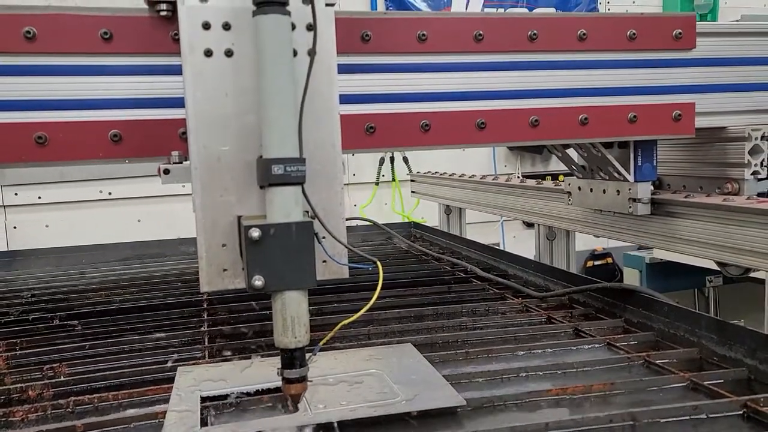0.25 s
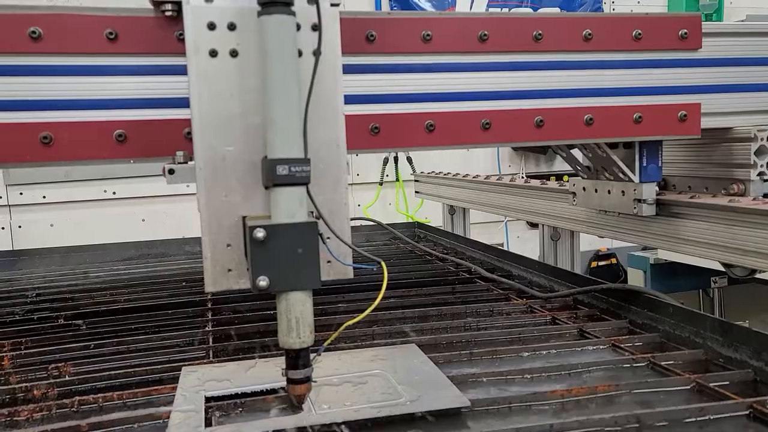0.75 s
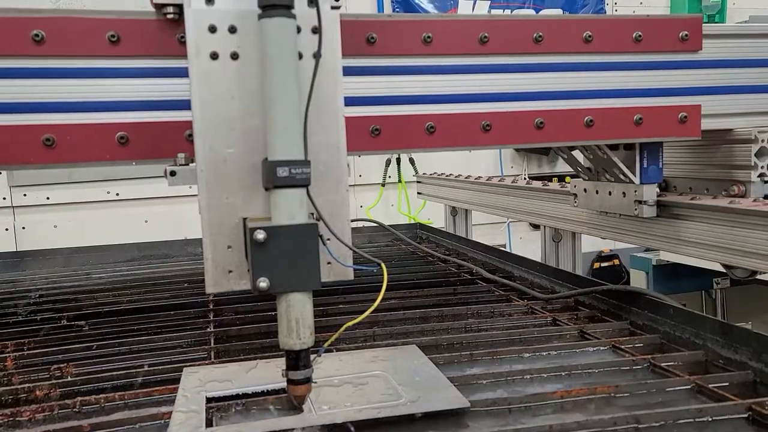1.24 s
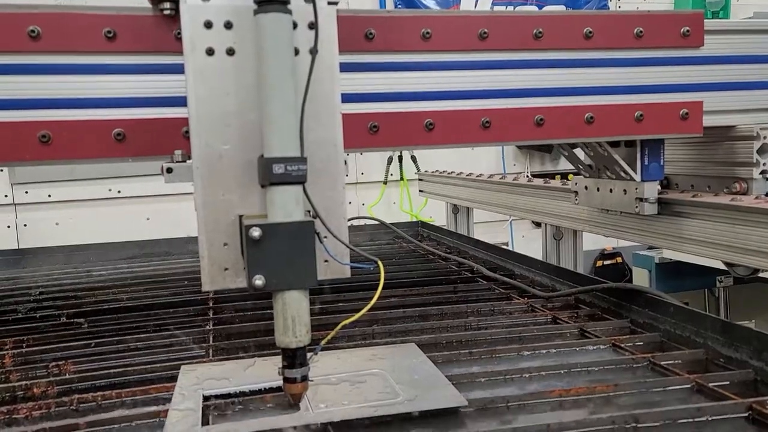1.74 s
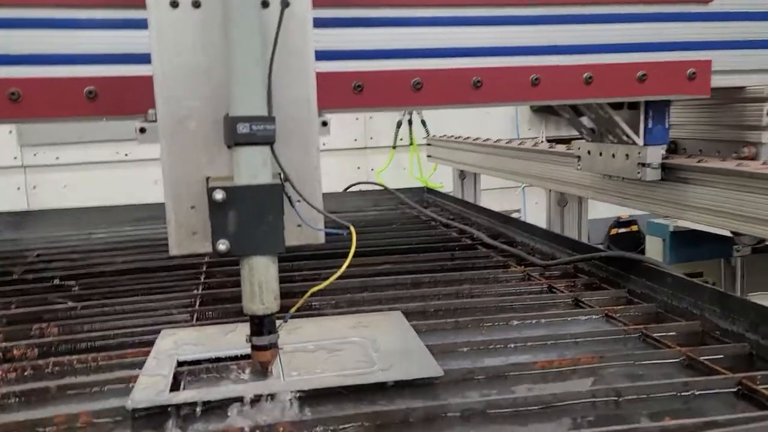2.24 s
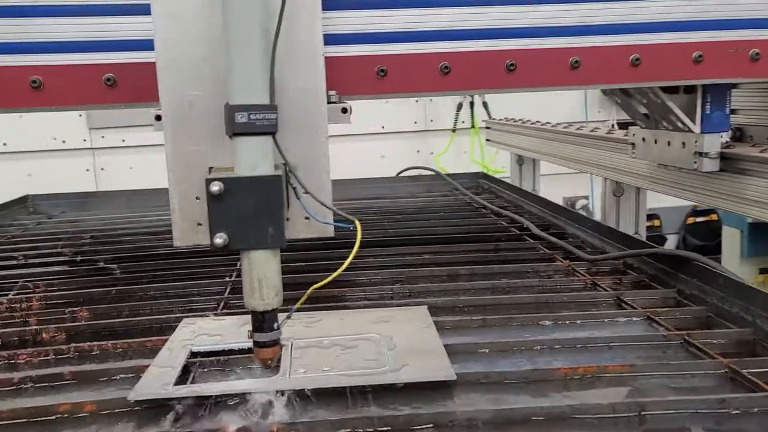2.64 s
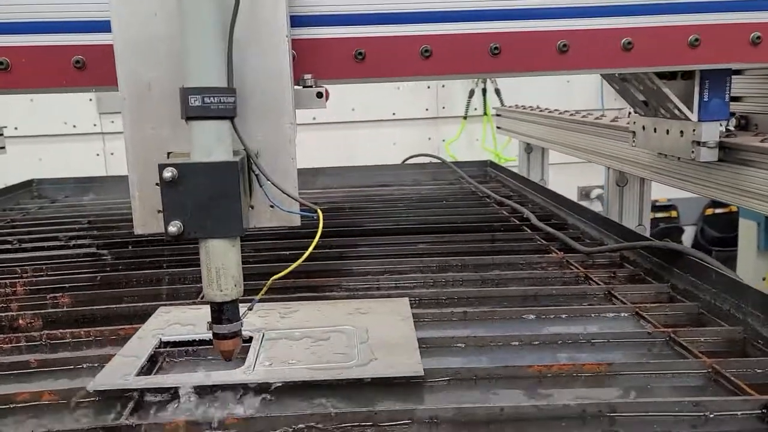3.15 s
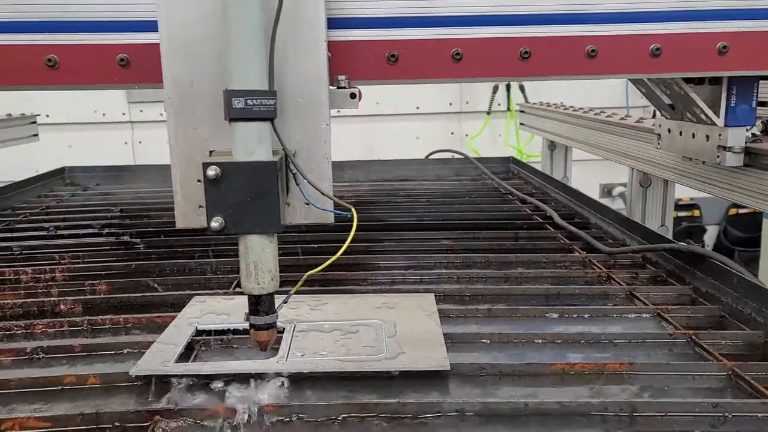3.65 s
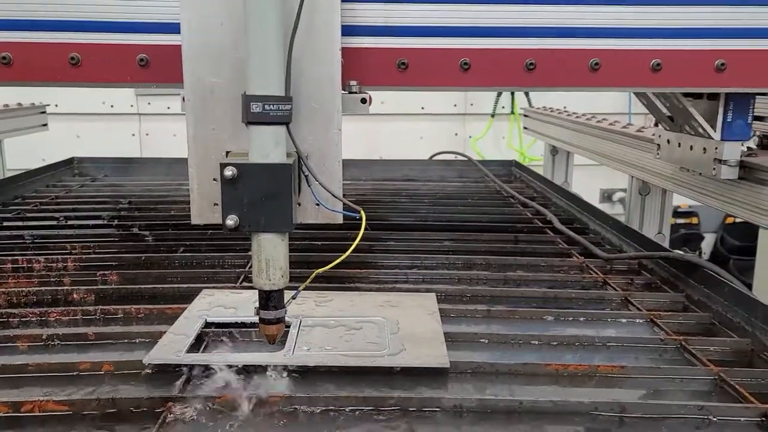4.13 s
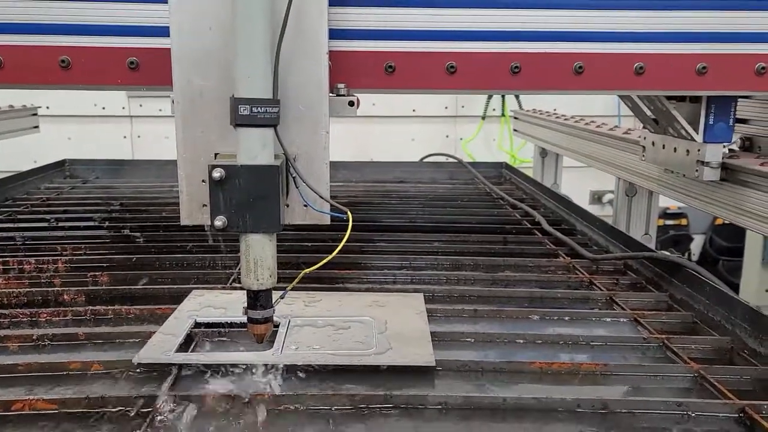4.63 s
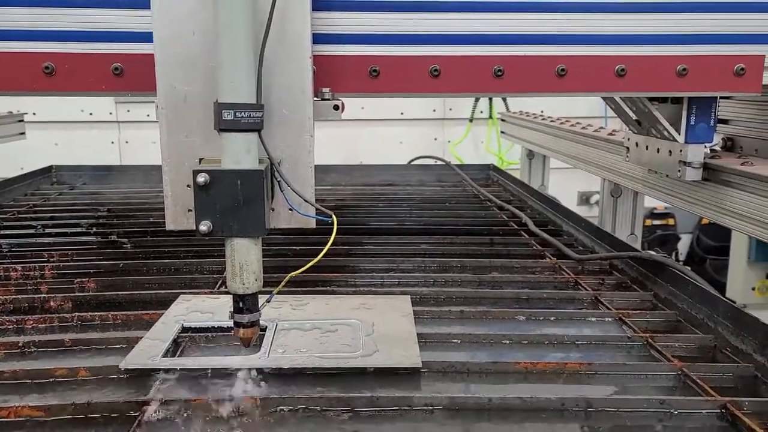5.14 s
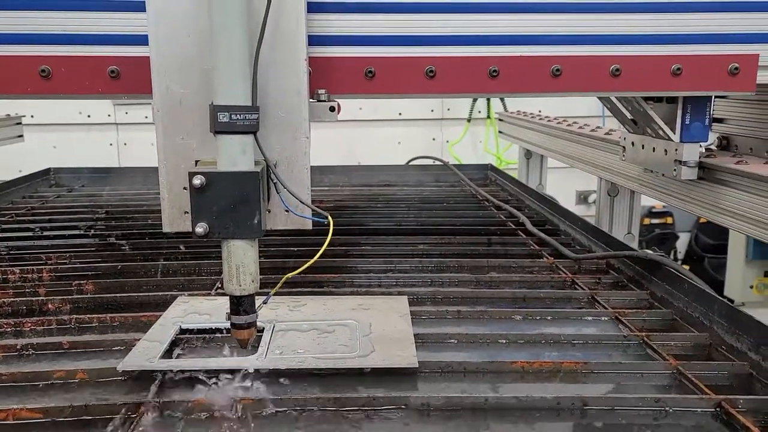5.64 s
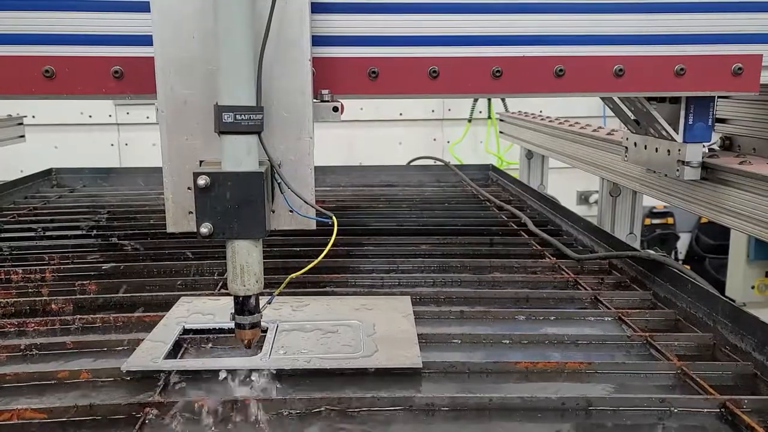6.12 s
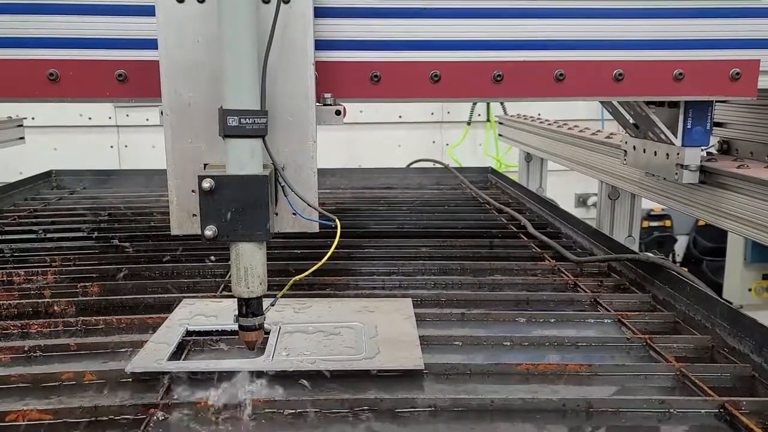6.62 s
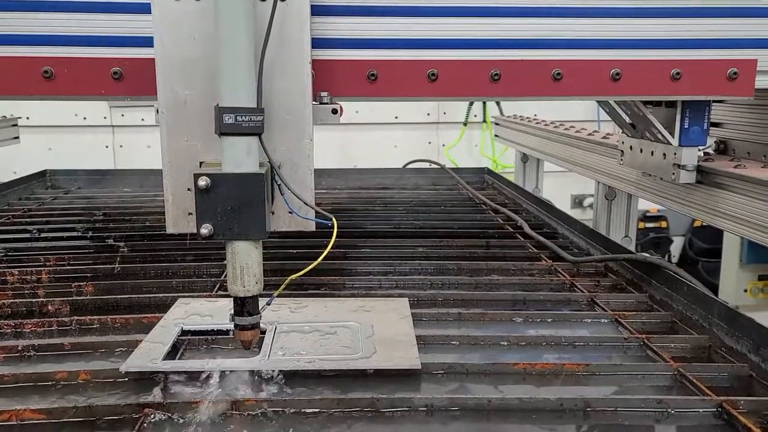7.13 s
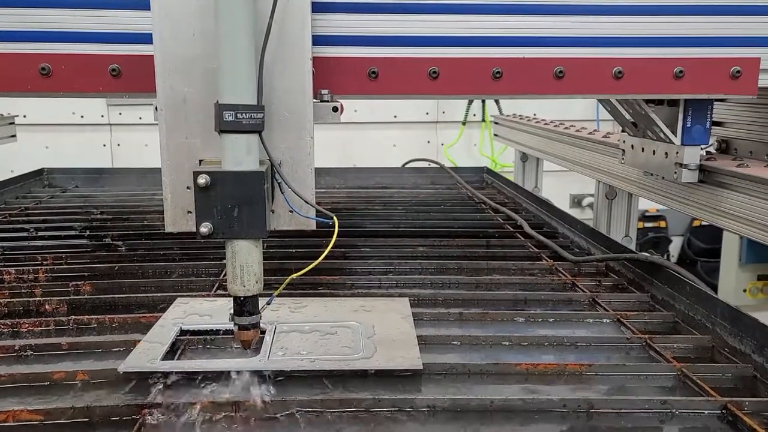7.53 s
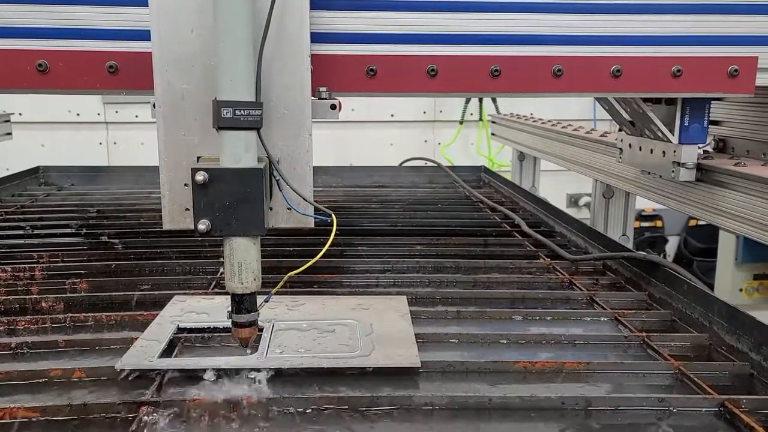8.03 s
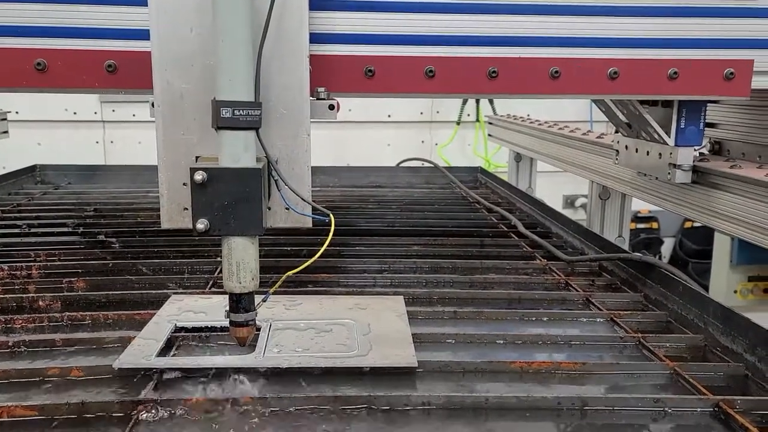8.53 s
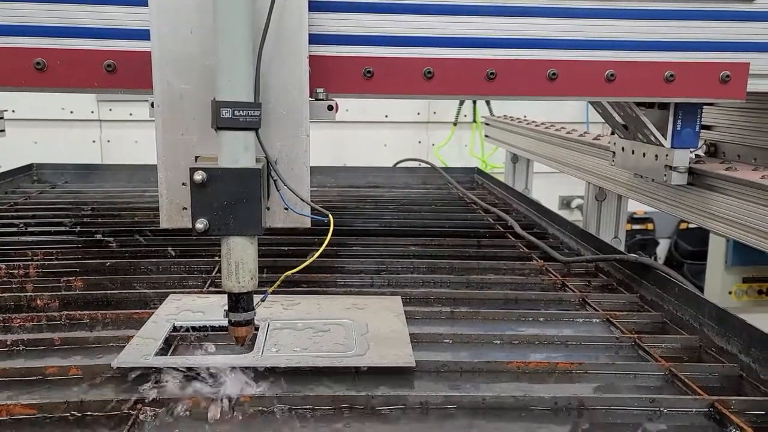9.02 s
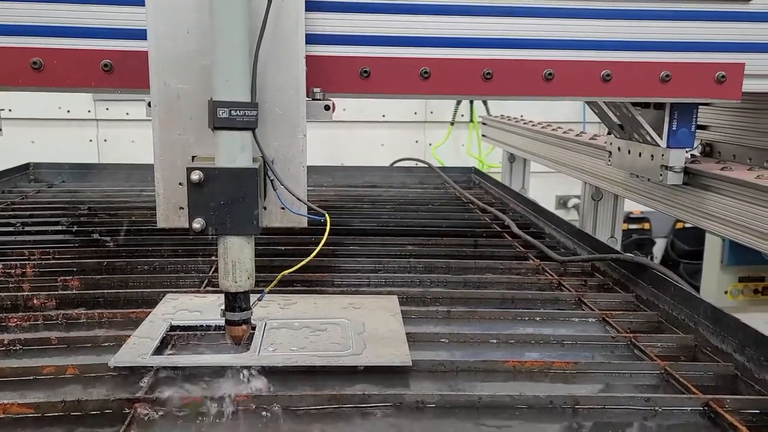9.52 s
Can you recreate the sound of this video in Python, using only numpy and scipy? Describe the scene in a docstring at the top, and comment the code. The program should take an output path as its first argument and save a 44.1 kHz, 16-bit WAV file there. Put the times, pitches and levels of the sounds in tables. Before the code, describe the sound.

A loud, steady, bright hiss of compressed air from a cutting torch blasts onto metal plate over water, fluttering slightly, with a few soft early thumps.

```python
"""In a workshop, compressed air blows from a cutting torch onto a metal plate over a water-filled slat table.
Noise in two channels makes the blast: its top octave flutters with the jet, its middle ripples with splashing
water, and the cavities under the plate add fuzzy peaks and notches. A hand-held two-port microphone turns towards
the torch, mostly after two seconds. A few spray drops thump on the left port, and early echoes ripple the hiss."""
import sys
import numpy as np
from scipy import signal
from scipy.fft import rfft, irfft
from scipy.io import wavfile
from scipy.ndimage import uniform_filter1d

SR = 44100
rng = np.random.default_rng(int(sys.argv[2]) if len(sys.argv) > 2 else 0)


def put_to_file(sound):
    """Save the sound as 16-bit audio at rate SR, in the file named by the first command-line argument."""
    columns = np.atleast_2d(sound).T  # one column per channel
    safe = np.clip(columns, -1, 1)
    whole_steps = np.round(safe * 32767)
    wavfile.write(sys.argv[1], SR, whole_steps.astype(np.int16))


N = 430857


def gain_of(db):
    """Turns decibels into a gain."""
    return 10 ** (np.asarray(db) / 20)


def evened(x):
    """Shifts and scales a signal to mean 0 and rms 1."""
    return (x - x.mean()) / x.std()


def read(points, hz):
    """Joins the points of a curve by straight lines on a log-frequency axis."""
    point_hz, value = np.transpose(points)
    curve = np.interp(np.log(hz + 1), np.log(point_hz + 1), value)
    return curve[:, None]


def patches(shape, wide, long):
    """Random field of rms 1, smoothed over neighbouring frequency bins (wide) and time frames (long)."""
    field = rng.standard_normal(shape)
    field = uniform_filter1d(field, max(round(wide), 1), 0)
    field = uniform_filter1d(field, max(round(long), 1), 1)
    return evened(field)


def echoes(x, echo_db=-19., t60=.15):
    """Gantry and walls comb the hiss into ripples: each port gets its own sparse early echoes plus a shared set."""
    t = np.arange(3000) / SR
    shape = (3, len(t))
    fade = gain_of(-60 * t / t60)  # falls 60 dB in t60 seconds
    struck = rng.random(shape) < .03  # reflections are sparse
    taps = rng.standard_normal(shape) * struck * fade * (t > .005)
    taps = taps[:2] + taps[2]  # each port's own echoes plus the shared ones
    taps *= gain_of(echo_db) / np.linalg.norm(taps, axis=1, keepdims=True)
    taps = uniform_filter1d(taps, size=3, axis=1) * np.sqrt(3)  # echoes lose their treble
    taps[:, 0] = 1  # the direct sound
    return signal.oaconvolve(x, taps, axes=1)[:, :N]


def pulse(age, time):
    """One-sided pressure bump that peaks at 1 after the given time in seconds."""
    return age / time * np.exp(1 - age / time)


def drops():
    """A drop squeezes the air in the port, a longer, softer bump; most drops also tick, two do not."""
    # Drops that hit the left port. Each row: start in seconds, tick peak in dB (-60 means no tick),
    # squeeze peak in dB, direction (+1 push, -1 pull), time to the squeeze peak in seconds.
    drop_hits = [(.1356, -23.5, -24.4, -1, .003), (.4290, -60, -33.5, 1, .0038),
                 (.8126, -30.1, -19.1, -1, .004), (1.3135, -26., -30., -1, .0021),
                 (1.54, -20.7, -17.3, 1, .0032), (1.581, -60, -41, -1, .005),
                 (2.0587, -24.5, -27.5, -1, .0025)]
    t = np.arange(N) / SR
    out = np.zeros(N)
    for start, tick_db, squeeze_db, sign, squeeze_s in drop_hits:
        age = np.maximum(t - start, 0)
        tick = gain_of(tick_db) * pulse(age, .00033)
        squeeze = gain_of(squeeze_db) * pulse(age, squeeze_s)
        out += sign * (tick + squeeze)
    return out


def jet(t):
    """Level of the nozzle hiss in dB: bell-shaped surges and sags over a random flutter that calms around them."""
    # The strongest surges and sags. Each row: middle in seconds, height in dB before the mean level is
    # removed (plus for a surge, minus for a sag), length in seconds at half height.
    surge_rows = [(0.13, 5, .06), (0.81, 4, .03), (1.09, 4, 0.045), (1.606, 4, .025), (1.886, 3, .035),
                  (2.238, 3, .06), (2.36, 4.5, .07), (2.629, 4, .05), (2.774, 5, 0.056), (3.273, 5, .03),
                  (3.328, -4, 0.045), (3.447, 4, .06), (3.722, 4, 0.055), (3.851, 4, .05),
                  (3.957, -4, 0.055), (4.83, -3.5, .04), (5.32, -1, .04), (5.717, 4.5, .055),
                  (6.72, -3.5, 0.046), (7.36, -2, 0.046), (7.8, -3, .04), (7.927, 3, .055),
                  (8.012, 3.5, .045), (8.64, -3, .05), (9.708, 4, 0.032)]
    flutter_depth_db = 1.4  # rms away from the surges
    shortest_s, longest_s = .02, .17  # rough range of the flutter's swings
    middle_s, height_db, length_s = np.transpose(surge_rows)[:, :, None]
    bells = np.exp(-4 * np.log(2) * ((t - middle_s) / length_s) ** 2)

    # keep only the flutter rates between the slow and fast limits
    rate_hz = np.fft.rfftfreq(len(t), t[1])
    chance = rfft(rng.standard_normal(len(t)))
    band = np.exp(-(rate_hz * shortest_s) ** 2) - np.exp(-(rate_hz * longest_s) ** 2)
    flutter_db = flutter_depth_db * evened(irfft(chance * band, len(t)))

    calm = 1 - bells.max(0)
    level_db = (height_db * bells).sum(0) + calm * flutter_db
    return level_db - level_db.mean()


def cavities(f):
    """Air between plate, slats and water resonates, lifting or dimming bands; returns dB for both ports."""
    # Peaks and notches. Each row: centre in Hz, width in Hz, left change in dB, right change in dB.
    cavity_rows = [(132, 150, -3, 0.5), (322, 66, -8, -1), (835, 31, -8.5, -10), (900, 42, 7, 0),
                   (1000, 40, 0, 5), (1064, 77, -6.5, -1.5), (1203, 29, 7, -1), (1296, 77, -1, -7.5),
                   (1440, 67, 2, 1), (1554, 62, -3, -11), (1690, 185, 5.5, 3.), (1910, 95, -10, -4),
                   (2075, 305, 8, 0.5), (2630, 38, 6.5, -4), (3207, 204, 6.5, -1), (2400, 120, -4., -3.),
                   (3750, 170, 3.5, -2.5), (3875, 50, 0., 5.), (3930, 140, -5., 0.), (4590, 300, 2., 0.),
                   (5090, 180, -4., -2.), (5260, 130, -1, 6), (5640, 92, -7.5, 3), (7070, 100, 6.5, 4),
                   (8500, 190, 0.5, -0.5)]
    total_db = 0
    for centre, width, left_db, right_db in cavity_rows:
        shape = 1 + (2 * (f - centre) / width) ** 2
        total_db = total_db + np.array([[[left_db]], [[right_db]]]) / shape
    return total_db


def blast():
    """Turbulent noise coloured per port; jet strength and splashing move the level of its bands."""
    # The hand moves the microphone. Each row: time in seconds, share turned towards the torch (0 to 1),
    # nearness in dB, which acts below the top octave.
    hand_moves = [(0., 0, .5), (1.3, 0.01, -.5), (1.9, 0.15, 0.5), (2.45, 0.24, 2), (2.66, 0.37, 2),
                  (2.76, 0.75, 0.5), (4.5, 0.8, 0), (6.9, 0.83, 0.5), (8.4, 0.86, .5), (9.77, 0.9, .5)]
    # Basic colour of the blast at each port, turned away and facing the torch.
    # Each row: frequency in Hz, level in dB per Hz before the cavities and level swings.
    left_away = [(40, -90), (310, -88), (700, -82.5), (840, -74.0), (1400, -74.5), (1620, -66.5),
                 (2480, -66.5), (3060, -61.0), (4050, -64.5), (5820, -62.5), (6940, -72.0), (8030, -62.5),
                 (9190, -69.5), (11430, -69.5), (14660, -53.0), (15600, -49.0)]
    right_away = [(40, -96), (310, -93.5), (700, -80.5), (1430, -73.5), (1920, -71.0), (2480, -70.0),
                  (3190, -68.0), (3880, -67.5), (4580, -64.5), (5080, -70.0), (7010, -62.5), (7310, -68.5),
                  (7860, -82.0), (9190, -67.5), (10410, -66.0), (15600, -65.5)]
    left_facing = [(40, -90.5), (310, -86.5), (650, -81.5), (880, -72), (1390, -69.5), (3100, -57.5),
                   (4020, -60.5), (5420, -59.5), (7020, -66.5), (8400, -58.5), (9470, -65), (14120, -56.5),
                   (14690, -53), (15600, -53)]
    right_facing = [(40, -95.0), (200, -89.0), (310, -91.0), (810, -76.0), (1640, -69.0), (2160, -71.0),
                    (3100, -63.0), (4260, -66.0), (6880, -62.0), (8080, -72.0), (9470, -63.0),
                    (10260, -66.0), (13840, -64.0), (15600, -67.0)]
    # Likeness of the two ports. Each row: frequency in Hz, share from 0 to 1 before the power curve below.
    alike_away = [(40, 0.1), (200, 1.0), (310, 0.9), (700, 1.0), (1640, 0.4), (1860, 0.64), (4540, 0.2),
                  (6390, 0.16), (7010, 0.4), (10300, 0.2), (12160, 0.3), (12940, 0.3), (15600, 0.4)]
    alike_facing = [(40, 0.36), (200, 0.93), (310, 0.63), (1700, 0.81), (1880, 0.45), (3100, 0.71),
                    (4020, 0.32), (4710, 0.66), (6880, 0.2), (15600, 0.39)]
    # How far the left port leads the right. Each row: frequency in Hz, phase in radians.
    lead_away = [(40, 0.), (400, .1), (700, 0.5), (1800, 1.23), (4000, 0.5), (6660, 2.1), (6940, 2.5),
                 (7010, 3.7), (7390, 8.5), (10190, 3.43), (11310, 5.7), (11910, 4.0), (12290, 3.2),
                 (15600, 1.3)]
    lead_facing = [(40, 0.), (400, .1), (900, .65), (1840, 2.), (2250, 1.2), (5750, 3.3), (6610, 4.1),
                   (7920, 7.8), (9860, 7.8), (10680, 6.7), (12530, 7.5), (13300, 6.3), (15600, 6.2)]
    frame, hop = 1024, 256  # samples
    shadow = .58  # share of the hiss swings that reaches the shadowed right port

    white = rng.standard_normal((2, N)) * np.sqrt(SR / 2)  # 0 dB per Hz
    hz, t, (near, other) = signal.stft(white, SR, nperseg=frame, noverlap=frame - hop)
    f = hz[:, None]
    move_s, turn_share, nearness_db = np.transpose(hand_moves)
    turn = np.interp(t, move_s, turn_share).clip(0, 1)
    near_db = np.interp(t, move_s, nearness_db)

    def turned(away, facing):
        """Blends two curves as the microphone turns."""
        return (1 - turn) * read(away, hz) + turn * read(facing, hz)

    # where each movement of the level acts
    top = 1 / (1 + np.exp((12800 - f) / 600))  # the nozzle rules the top octave
    swell_band = np.exp(-((f - 3200) / 400) ** 2)  # the hiss swells at random around 3.2 kHz
    middle = (1 - top) / (1 + np.exp((4200 - f) / 500))  # splashing water rules the middle

    hiss_db = jet(t)
    swell_db = 1.8 * patches(near.shape, wide=8, long=4)
    splash_db = 0.94 * patches(near.shape, wide=30.5, long=6)
    splash_db += 0.88 * patches(near.shape, wide=240, long=3)
    flicker_db = 1.5 * patches(near.shape, wide=30, long=3)
    drift_db = 1.2 * patches(near.shape, wide=8, long=9.7)
    shared_db = (1 - top) * near_db + swell_band * swell_db + middle * splash_db + drift_db

    left_db, right_db = cavities(f) + shared_db
    left_db += turned(left_away, left_facing) + top * (hiss_db + flicker_db)
    right_db += turned(right_away, right_facing)
    right_db += top * (shadow * hiss_db + 1.2 * flicker_db)  # shadowed, more room

    # the right port hears a phase-shifted part of the left noise and a part of its own
    alike = turned(alike_away, alike_facing).clip(0, 1) ** .8
    late = (1 - turn) * np.exp(-1j * read(lead_away, hz)) + turn * np.exp(-1j * read(lead_facing, hz))
    late = late / (abs(late) + 1e-9)  # phase only
    right = alike * near * late + np.sqrt(1 - alike ** 2) * other
    ports = np.array([near * gain_of(left_db), right * gain_of(right_db)])
    return signal.istft(ports, SR, nperseg=frame, noverlap=frame - hop)[1][:, :N]


def scene():
    """The blast with its echoes at both ports, the drops at the left."""
    left_only = np.array([[1], [0]])
    return echoes(blast()) + drops() * left_only


def record(dry):
    """The capsule vent lets slow pressure swings out; then a steep filter takes away the highest treble."""
    edge_hz = 15735
    vent = signal.butter(3, 28.4, "high", fs=SR, output="sos")
    vented = signal.sosfilt(vent, dry)
    band_limit = signal.firwin(1023, edge_hz, window=("kaiser", 9), fs=SR)
    return signal.oaconvolve(vented, band_limit[None], "same")


dry = scene()
out = record(dry)
put_to_file(out)
```